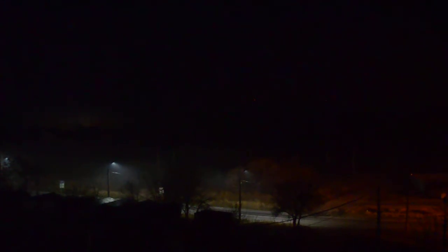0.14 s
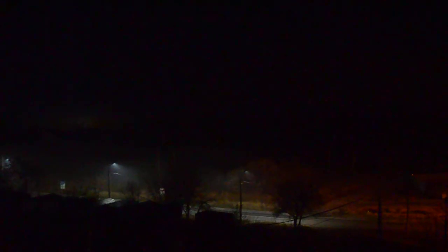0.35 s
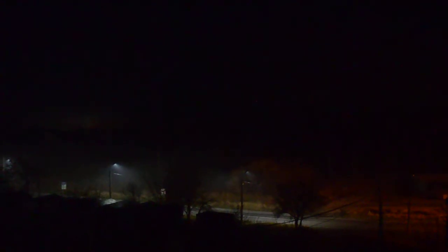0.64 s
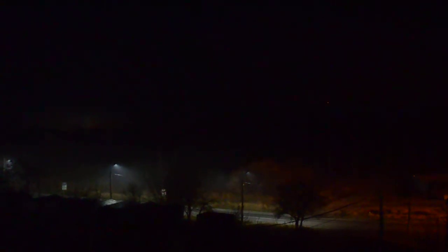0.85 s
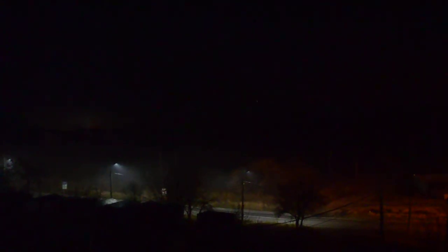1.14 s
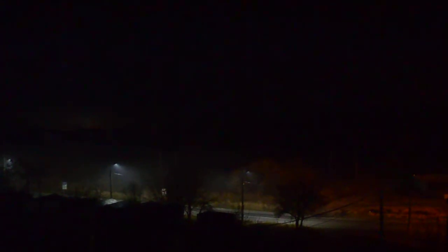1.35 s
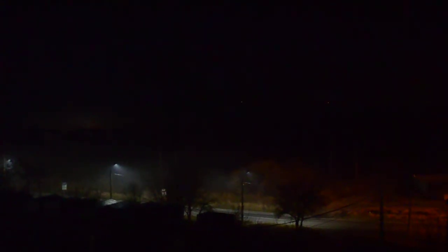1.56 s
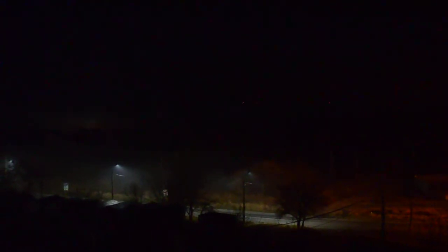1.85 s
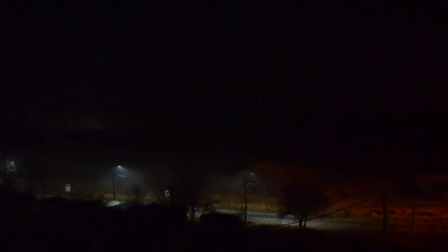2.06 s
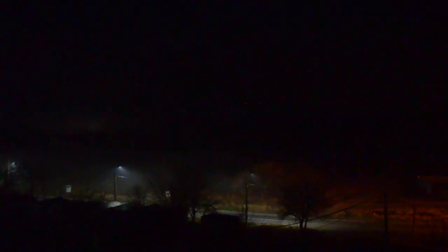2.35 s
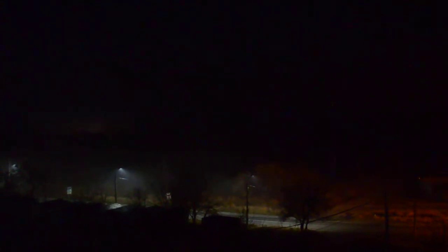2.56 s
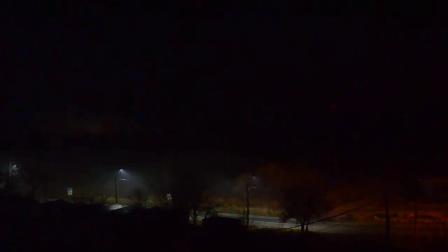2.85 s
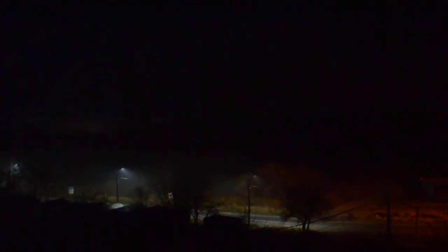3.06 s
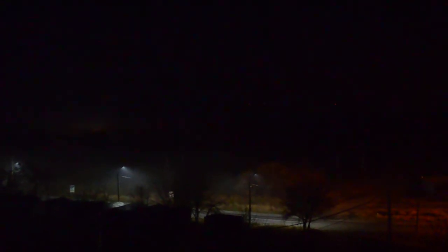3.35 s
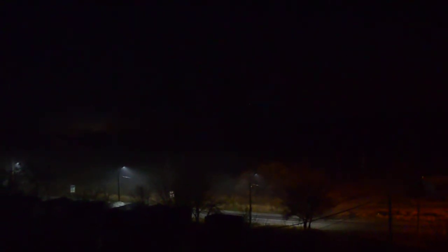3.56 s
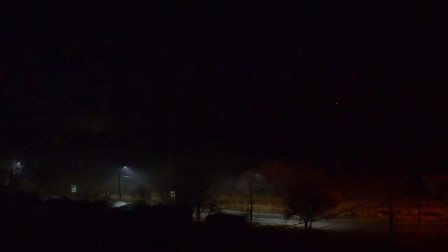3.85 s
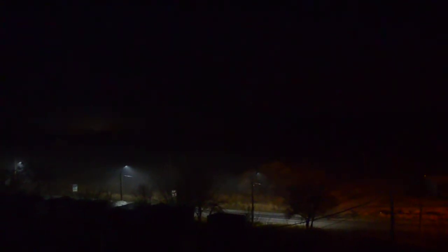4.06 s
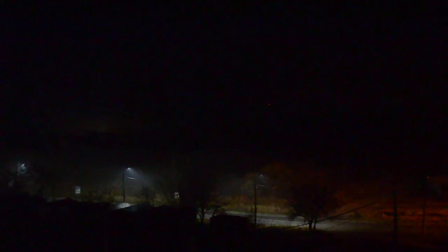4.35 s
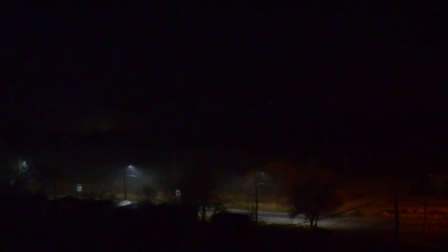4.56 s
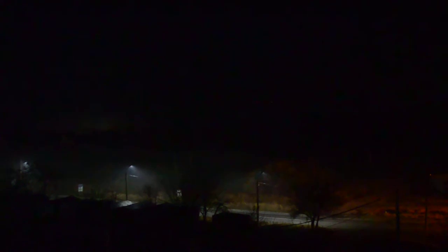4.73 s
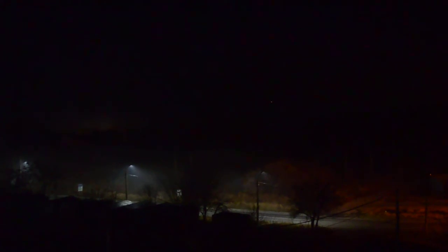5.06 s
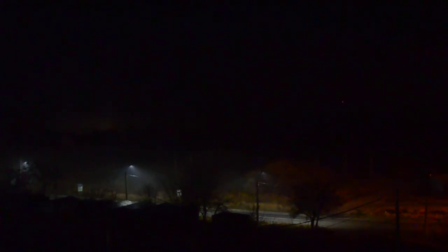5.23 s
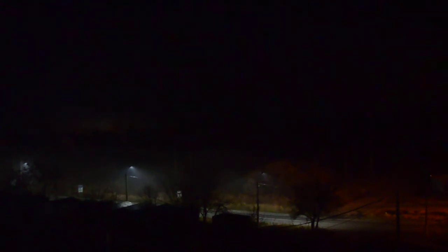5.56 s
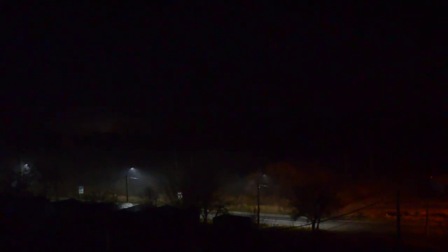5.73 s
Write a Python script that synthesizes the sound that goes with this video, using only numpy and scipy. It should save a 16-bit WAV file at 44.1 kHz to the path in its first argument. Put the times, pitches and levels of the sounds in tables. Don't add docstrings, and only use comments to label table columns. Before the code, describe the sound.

Heavy artillery fires two pairs of overloading booms across a night town, each rolling away into rumbling building echoes over a low hum.

```python
import sys
import numpy as np
from scipy import signal
from scipy.fft import rfft, irfft, next_fast_len
from scipy.io import wavfile
from scipy.ndimage import uniform_filter1d

SR = 44100
rng = np.random.default_rng(int(sys.argv[2]) if len(sys.argv) > 2 else 0)


def linear_from_db(decibels):
    return 10 ** (np.asarray(decibels, float) / 20)


def wav_record(signal):
    frames = np.transpose(np.atleast_2d(signal))
    bounded = np.clip(frames, -1, 1)
    quanta = np.round(bounded * 32767).astype(np.int16)
    wavfile.write(sys.argv[1], SR, quanta)


N = 260011
LONG = next_fast_len(N)
HZ = np.fft.rfftfreq(LONG, 1 / SR)
STEP = 8

# (time [s], wait until echoes thicken [s], peak [dB], swing rate [Hz], life [swings])
BLASTS = [
    (.6817, .030, 2.5, 450, .8),
    (1.3584, .010, -5, 1700, .9),
    (3.0818, .032, 2, 400, .55),
    (3.7619, .030, -4, 500, 2.3),
]


def evened(x):
    return x / np.sqrt(np.mean(x ** 2) + 1e-20)


def read(points, hz):
    f, value = np.transpose(points)
    return np.interp(np.log(hz + 1), np.log(f + 1), value)


def add(mix, s, sound):
    start = round(s * SR)
    sound = sound[max(-start, 0):]
    part = mix[max(start, 0):][:len(sound)]
    part += sound[:len(part)]


def heard(spectrum):
    return irfft(spectrum, LONG)[:N]


def scatter(per_s, spread_db):
    size_db = spread_db * np.minimum(rng.exponential(1, LONG), 4)
    size = linear_from_db(size_db) * rng.standard_normal(LONG)
    return rfft(size * (rng.random(LONG) < per_s / SR))


def bump(s, width):
    t = np.arange(0, N, STEP) / SR
    return np.exp(-((t - s) / width) ** 2)


def filled(levels):
    every_sample = np.repeat(levels, STEP, axis=-1)[..., :N]
    return uniform_filter1d(every_sample, size=STEP, axis=-1)


def nook_db():
    # (frequency [Hz], width [Hz], boost or dip [dB])
    resonances = [(88, 20, 2), (123, 20, 3), (150, 18, -6), (185, 30, 4), (280, 25, -5), (350, 20, -4),
                  (435, 45, 4), (485, 25, -7), (540, 40, 2), (600, 25, -5), (700, 30, -3), (1090, 40, -4),
                  (1410, 60, -5), (1800, 60, 3), (1900, 40, -3), (2250, 50, -4)]
    return sum(db / (1 + (2 * (HZ - hz) / width) ** 2) for hz, width, db in resonances)


def swing(db, hz, swings):
    t = np.arange(1500) / SR
    wave = np.sin(2 * np.pi * hz * t) * np.exp(-t * hz / swings)
    wave = signal.lfilter(*signal.butter(4, 2300, fs=SR), wave)
    return linear_from_db(db) * wave / abs(wave).max()


def fronts():
    # (time [s], peak [dB], swing rate [Hz], life [swings])
    wall_fronts = [(.6932, 2, 420, 1.3), (.6999, 5.5, 560, .7), (.7040, -2, 230, .8), (.7095, -4, 750, 2.5),
                   (.7143, -5, 250, 1), (1.3630, -8, 350, 1), (3.0936, 1, 270, .5), (3.0947, 1, 900, .7),
                   (3.0963, -1, 1000, .6), (3.0984, 1.5, 380, .8), (3.1030, -4, 300, .6),
                   (3.1046, 2, 700, .8), (3.1101, -1.5, 300, 1), (3.1146, -3, 300, .9),
                   (3.7640, .5, 460, 1.3), (3.7692, -11, 350, .8), (3.8572, -11, 450, 4)]
    # (time [s], peak [dB], swing rate [Hz], life [swings])
    pushes = [
        (-.0012, -8, 330, 2.5),
        (.6874, -8, 500, 1),
        (.7009, 3, 260, .6),
        (1.3594, -6, 280, 1.1),
        (.7058, -7, 900, 1.5),
        (3.0951, 6, 190, .6),
        (3.0966, -8, 300, .5),
        (3.1064, -2, 150, .7),
        (3.7950, -6, 430, 5),
    ]
    wall_s, wall_top_hz = .0095, 470
    rebound_s, rebound_hz, rebound_db = .0024, 150, -8
    out = np.zeros(N)
    for s, wait, db, hz, swings in BLASTS:
        add(out, s, -swing(db, hz, swings))
        add(out, s + wall_s, -swing(db, min(hz, wall_top_hz), swings))
        add(out, s + rebound_s, swing(db + rebound_db, rebound_hz, .8))
    for sign, rows in ((-0.73, wall_fronts), (0.98, pushes)):
        for s, *shape in rows:
            add(out, s, sign * swing(*shape))
    return out


def voiced(db, bass_db, treble_db, clatter_db, edge_db):
    edge_slope = 1.69
    tone_db = [[bass_db], [0], [clatter_db + treble_db], [edge_db + edge_slope * treble_db]]
    return linear_from_db(db + np.array(tone_db))


def echo_db():
    # (body [dB], time until 20 dB down [s], bass [dB], treble [dB])
    near_streets = [
        (-15.5, 0.14, -6, -3),
        (-13, 0.1065, 5, 3),
        (-18.5, 0.17, 3, -2.5),
        (-12.5, 0.16, 2, 2),
        (-12.5, 0.16, -7.5, -6),
    ]
    # (body [dB], bass [dB], treble [dB])
    far_town = [
        (-29.5, -3.5, 0.5),
        (-34, 2, 2.5),
        (-35, 0, 1.5),
        (-34.5, -3, 4.5),
        (-36.5, -5, 4),
    ]
    far_t60 = [14.1, 9.1, 6.33, 3.34]
    # (time [s], width [s], body [dB], bass [dB], treble [dB])
    swells = [(0.349, 0.025, -44, -9, -1.5), (.703, 0.0062, -7, 6, 6.5), (0.746, 0.016, -14, -5, -6),
              (.775, 0.038, -24.5, 5, 1), (1.0, 0.087, -33.5, -12, 0.5), (1.349, 0.012, -23, -6, -2.5),
              (1.44, 0.027, -31, 4, 7), (1.501, 0.041, -32, -6, 3), (1.581, 0.053, -36, -7, 5),
              (2.08, 0.14, -36.5, 2, -18), (2.25, 0.066, -45, -2, -6), (3.087, 0.0034, -7, 3.5, -1),
              (3.1, 0.0086, -4.5, 1.5, 10.5), (3.128, 0.0046, -22, -3, 2), (3.4, 0.13, -40, 4.5, 8),
              (3.739, 0.029, -34, -10, 2.5), (3.772, 0.00297, -13, -3, -4.5), (3.84, 0.023, -23, -4, 2),
              (3.884, 0.021, -21.5, -6, -17), (3.97, 0.058, -40, -8, 8), (4.16, .025, -37, -3, 3.5),
              (4.23, 0.018, -41, 8, 2), (4.33, 0.0092, -40, -6, 4), (5.7, 0.28, -46, 11.5, -20)]
    near_voice, far_voice = (-5.5, -24.5), (-6, -19)  # clatter, edge [dB]
    arrivals_s = [-.02] + [row[0] for row in BLASTS]
    t, power = np.arange(0, N, STEP) / SR, 1e-12
    for s, (db, length, *tone) in zip(arrivals_s, near_streets):
        fall = (t >= s) * linear_from_db(-20 * np.minimum(abs(t - s) / length, 9) ** 1.21)
        power = power + (fall * voiced(db, *tone, *near_voice)) ** 2
    for s, (db, *tone) in zip(arrivals_s, far_town):
        fall = (t >= s) * linear_from_db(-60 * abs(t - s) / np.array(far_t60)[:, None])
        power = power + (fall * voiced(db, *tone, *far_voice)) ** 2
    for s, width, db, *tone in swells:
        power = power + (bump(s, width) * voiced(db, *tone, *near_voice)) ** 2
    return filled(10 * np.log10(power))


def building_up():
    t, gain = np.arange(N) / SR, np.ones(N)
    for s, wait, *_ in BLASTS:
        behind = np.maximum((t - s) / wait, 0)
        gain = gain * (1 - .87 * np.exp(np.minimum((t - s) / .002, -behind ** 3)))
    return uniform_filter1d(gain, size=60)


def roar():
    # (low edge [Hz], high edge [Hz])
    bands = [
        (60, 250),
        (250, 600),
        (600, 2000),
        (2000, 5000),
    ]
    # (frequency [Hz], level [dB per Hz])
    colour = [(25, -26.5), (50, -36.5), (90, -7), (190, -2), (300, -3), (450, -4), (700, -12.5),
              (1200, -19), (2000, -29), (3000, -41.5), (4200, -56), (5500, -61.5), (8000, -70),
              (12000, -120)]
    spectrum = scatter(9000, 0.69) * linear_from_db(read(colour, HZ) + nook_db())
    own_db = []
    for lo, hi in bands:
        inside = spectrum[(HZ > lo) & (HZ < hi)]
        own_db.append(10 * np.log10(2 * np.sum(abs(inside) ** 2) / LONG ** 2))
    gain_db = echo_db() - np.array(own_db)[:, None]
    middles = np.log(np.sqrt(np.prod(bands, axis=1)))
    slices, out = np.linspace(middles[0], middles[-1], num=10), np.zeros(N)
    for k, one in enumerate(np.eye(len(slices))):
        share = np.interp(np.log(HZ + 1), slices, one)
        blend = [np.interp(slices[k], middles, row) for row in np.eye(len(middles))]
        out += heard(spectrum * share) * linear_from_db(blend @ gain_db)
    return out * building_up()


def rolls():
    # (time [s], level [dB], 60 dB decay [s])
    deep_blasts = [
        (0, -48, 5.5),
        (.682, -40, 3),
        (1.358, -43, 2),
        (3.082, -33, 2.56),
        (3.762, -45, 2.4),
    ]
    # (frequency [Hz], level [dB per Hz])
    colour = [(8, -14.5), (25, -0.5), (50, 9), (75, -4.5), (120, -41), (300, -89)]
    t = np.arange(N) / SR
    deep = evened(heard(rfft(rng.standard_normal(LONG)) * linear_from_db(read(colour, HZ))))
    level = sum((t >= s) * linear_from_db(db - 60 * np.maximum(t - s, 0) / t60) for s, db, t60 in deep_blasts)
    return deep * uniform_filter1d(level, size=400, origin=199)


def hum():
    # (frequency [Hz], level [dB per Hz])
    colour = [(25, -25.5), (50, -26), (90, -10), (190, -2.5), (300, -15.5), (450, -17), (700, -22),
              (1200, -31.5), (2200, -43.2), (3500, -53.4), (6300, -58.5), (10000, -65.5), (15500, -73.5)]
    noise = rfft(rng.standard_normal(LONG))
    return linear_from_db(-38) * evened(heard(noise * linear_from_db(read(colour, HZ) + nook_db())))


def slaps():
    # (time [s], peak [dB], top frequency [Hz], tail share [ratio])
    spikes = [(0.459, -35, 1800, .06), (.7008, -10.5, 3000, .03), (.7100, -14, 2230, 0.12),
              (.7335, -8, 890, 0.06), (1.097, -27, 1200, 0.077), (1.3591, -12, 2200, 0.05),
              (1.369, -9.5, 1300, 0.12), (1.4180, -23.5, 2200, 0.096), (1.4242, -19.5, 1500, 0.09),
              (1.443, -19, 1400, .08), (1.5697, -25, 1900, .06), (1.755, -34.5, 1700, 0.062),
              (2.29, -42, 1490, .15), (2.351, -37, 1000, .06), (2.52, -46.5, 5000, .03),
              (3.096, 8.5, 2300, 0.014), (3.1014, -5, 1900, 0.056), (3.7658, -13, 2180, 0.041),
              (3.7727, -9, 1400, 0.048), (3.896, -34, 1600, 0.084), (3.9613, -19, 1900, 0.065),
              (3.986, -27, 1300, .1), (4.075, -40, 1600, .06), (4.149, -27, 900, 0.08),
              (4.1678, -23.5, 1600, 0.033), (4.324, -33, 900, 0.11), (4.513, -42, 1500, .06),
              (5.315, -45, 1780, 0.088)]
    tail_t60_s = .05
    out, t = np.zeros(N), np.arange(4000) / SR
    grits = rng.standard_normal((len(spikes), len(t)))
    for (s, db, hz, share), grit in zip(spikes, grits):
        crack = (t == 0) + share * grit * linear_from_db(-60 * t / tail_t60_s)
        crack = signal.lfilter(*signal.butter(1, 500, "highpass", fs=SR), crack)
        crack = signal.sosfilt(signal.bessel(5, hz, fs=SR, output="sos", norm="mag"), crack)
        crack = signal.lfilter(*signal.butter(4, 5200, fs=SR), crack)
        add(out, s, linear_from_db(db) * crack / abs(crack).max())
    return out


def rush():
    # (time [s], hiss [dB], crackle [dB])
    first_blasts = [
        (.682, -2, -3.5),
        (3.082, 2, -2),
    ]
    # (delay [s], width [s], level [dB])
    hiss_swells = [
        (.155, 0.055, -61),
        (.27, 0.098, -66.5),
        (.45, .12, -59),
        (.6, 0.044, -69.5),
        (.74, .08, -77),
    ]
    # (delay [s], width [s], level [dB])
    crackles = [
        (.318, .014, -52.5),
        (.378, .012, -56),
        (.45, .015, -64),
    ]
    # (frequency [Hz], level [dB per Hz])
    colour = [(2500, -6), (4200, -3), (5300, -8), (6400, -5.5), (7500, -11), (8500, -16), (10000, -29.5),
              (13000, -49.5)]
    hiss = heard(scatter(4600, 1.6) * linear_from_db(read(colour, HZ)))
    level = 0
    for s, hiss_db, crackle_db in first_blasts:
        for rows, more_db in ((hiss_swells, hiss_db), (crackles, crackle_db)):
            for delay, width, db in rows:
                level = level + linear_from_db(db + more_db) * bump(s + delay, width)
    return evened(hiss) * filled(level)


def scene():
    return (fronts() + roar() + rolls() + hum() + slaps() + rush())[None]


def roll_off(x):
    return signal.sosfilt(signal.butter(12, 15800, fs=SR, output="sos"), x)


def record(dry):
    # (frequency [Hz], width [Hz])
    port_notches = [(5700, 500), (6950, 160)]
    mic = dry
    for hz, width in port_notches:
        mic = signal.lfilter(*signal.iirnotch(hz, hz / width, SR), mic)
    mic = mic * np.minimum(np.arange(N)[::-1] / 150, 1)
    mix = np.clip(mic, -1, 1)
    return roll_off(mix)


dry = scene()
out = record(dry)
wav_record(out)
```